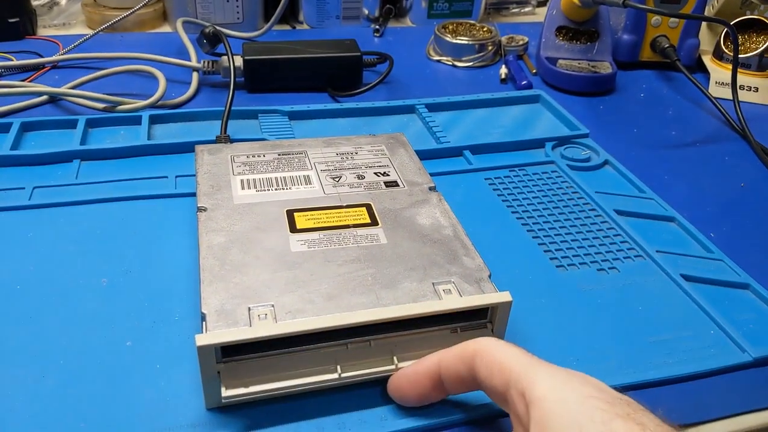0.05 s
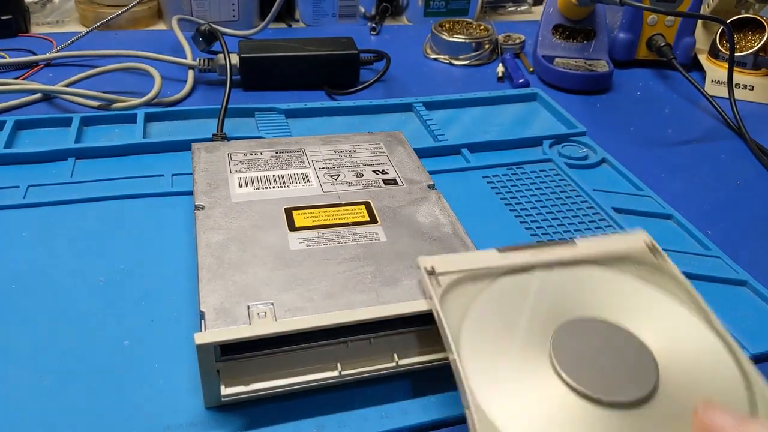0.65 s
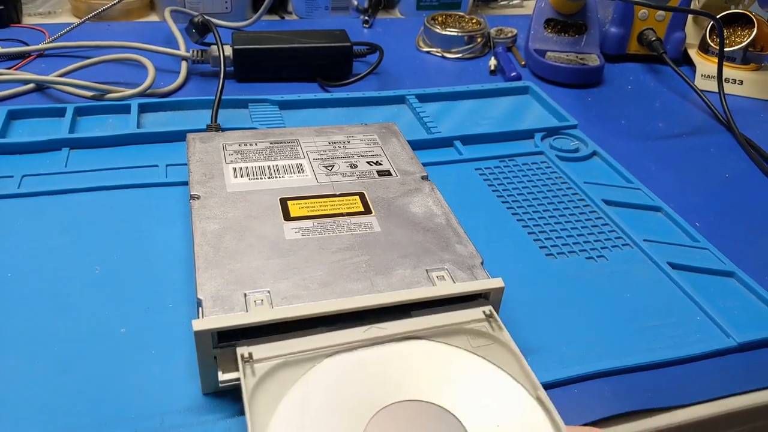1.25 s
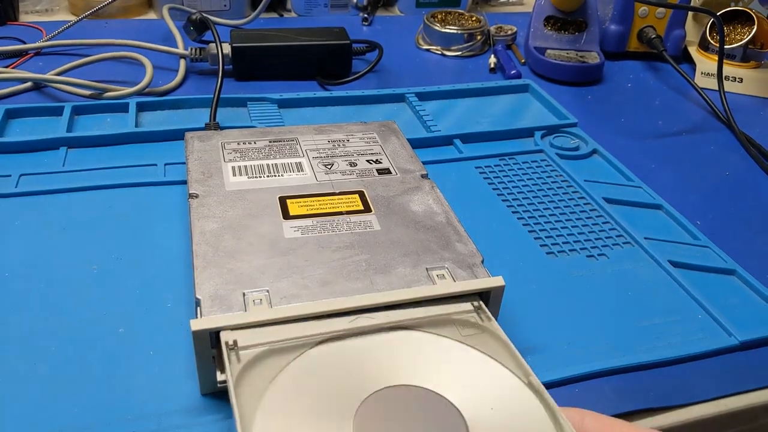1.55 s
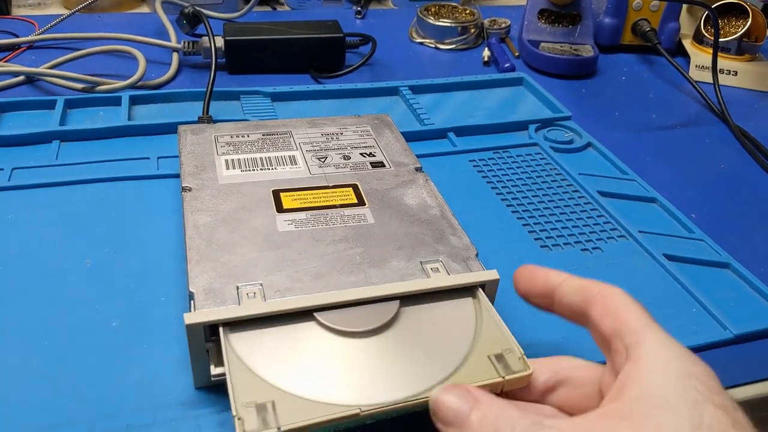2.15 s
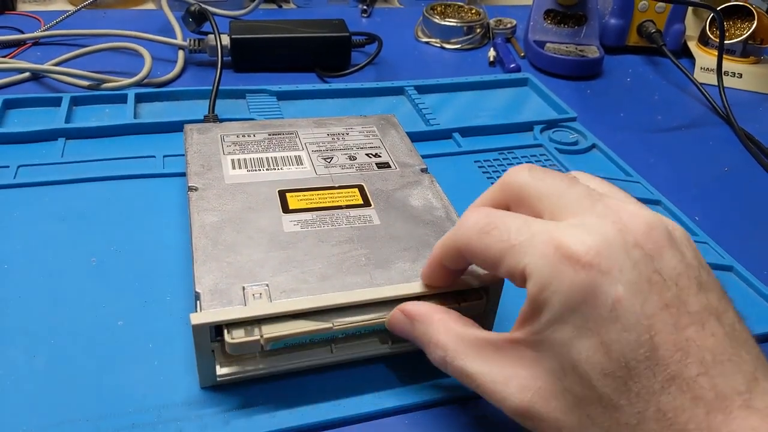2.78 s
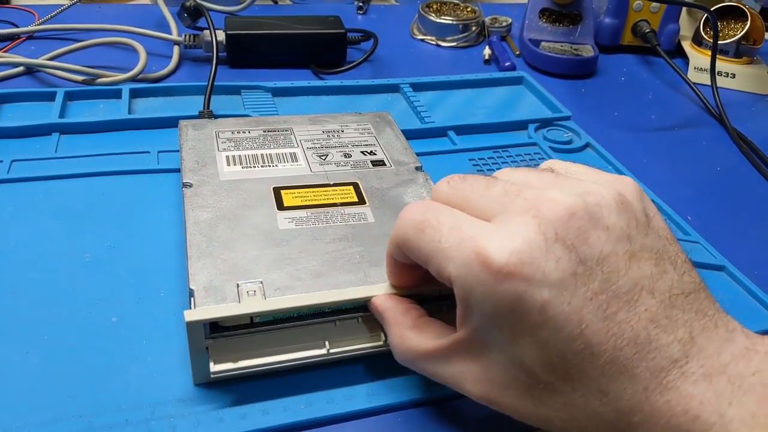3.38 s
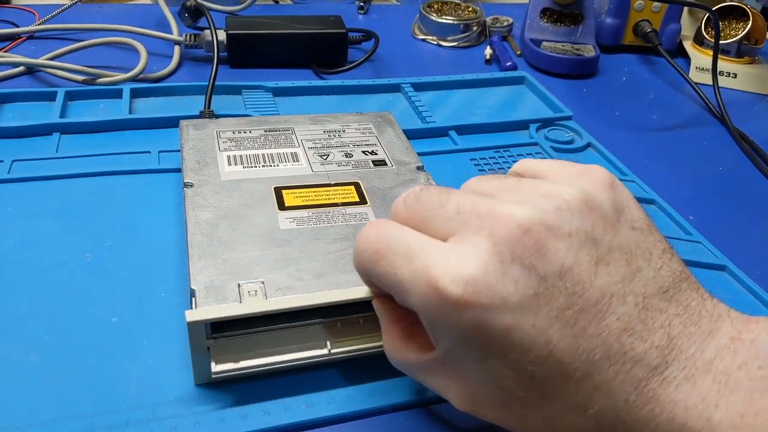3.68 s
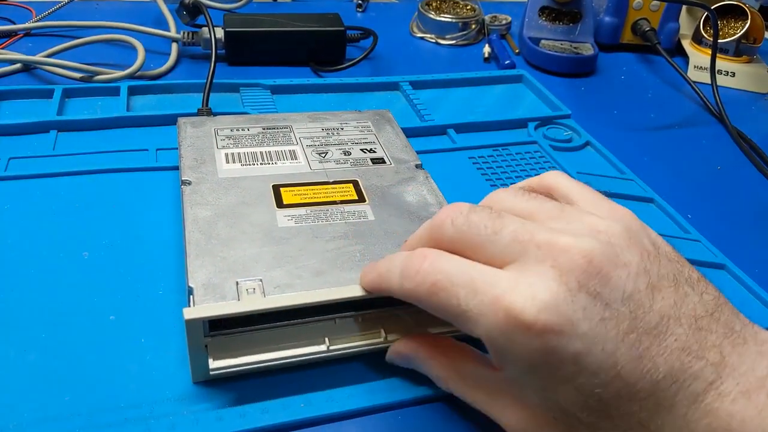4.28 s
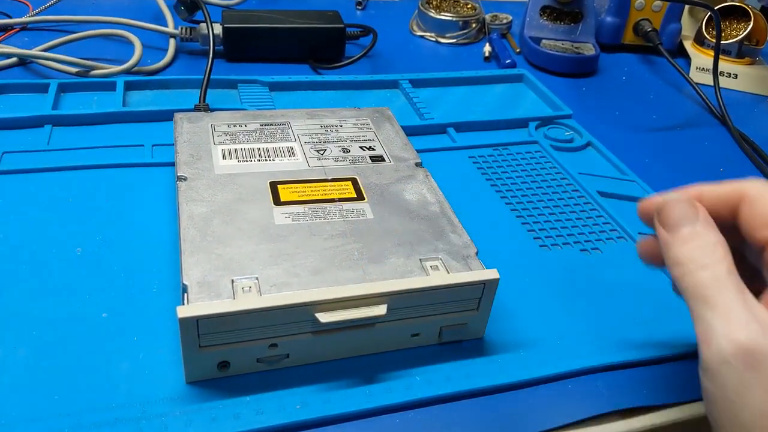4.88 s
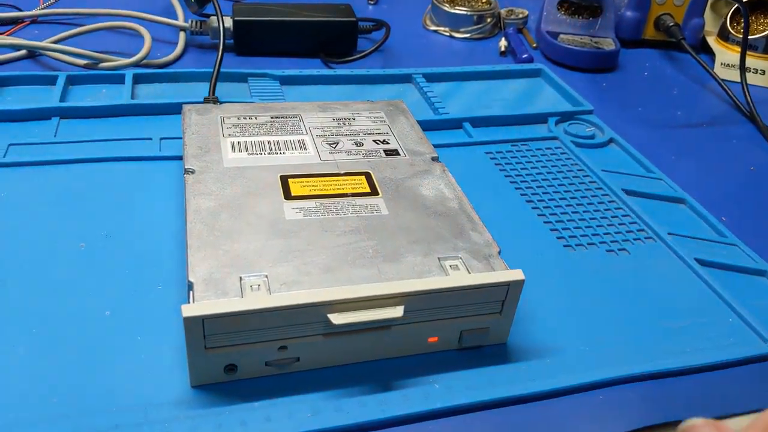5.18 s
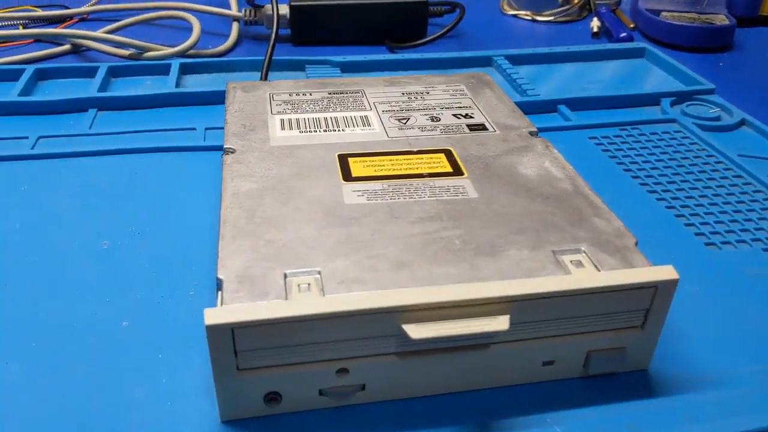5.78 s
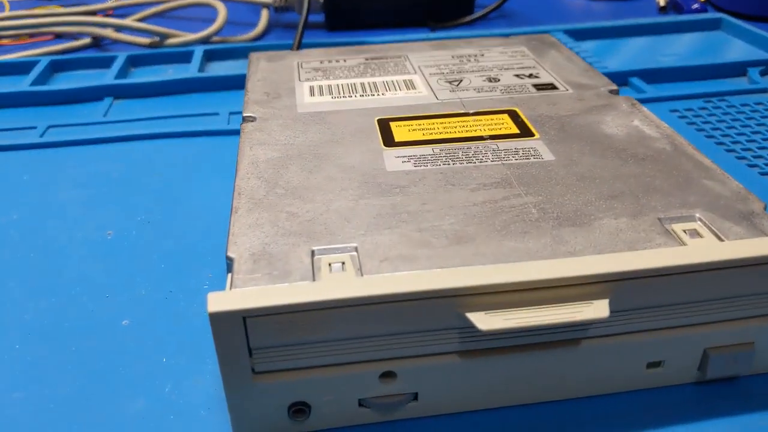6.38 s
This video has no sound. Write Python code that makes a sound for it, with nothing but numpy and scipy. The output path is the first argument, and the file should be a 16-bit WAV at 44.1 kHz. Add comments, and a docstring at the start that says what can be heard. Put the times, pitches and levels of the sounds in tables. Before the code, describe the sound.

Close up in a small, dry, softly humming workroom, hollow plastic clicks and rubs as a caddy is pushed into a disc drive. Short squeaks and faint gear squeals follow as it is pulled inside, ending in a double clack with a low thump. Then the sprung flap closes with the loudest snap, briefly ringing the steel case, and a faint airy whir of the spinning disc remains.

```python
"""A small dry workroom with a low hum; a stereo microphone close to a disc drive on a bench mat.
A plastic caddy is picked up, rattled into the slot and pushed home: its shell clicks at each contact
and rubs on the guides. The loader draws it in with stick-slip squeaks and thin gear squeals, then
clamps it with a clack that thumps the bench. The sprung front flap snaps shut and sets the steel
case ringing; the drive then spins up faintly."""
import sys
import numpy as np
from scipy import signal
from scipy.fft import rfft, irfft, next_fast_len
from scipy.io import wavfile

SR = 44100
rng = np.random.default_rng(int(sys.argv[2]) if len(sys.argv) > 2 else 0)


def int16_out(signal):
    """Quantize to a 16-bit WAV file."""
    q = np.round(np.clip(np.atleast_2d(signal).T, -1, 1) * 32767)
    wavfile.write(sys.argv[1], SR, q.astype(np.int16))


N = 288052

# stereo picture of the room and of the close sources: f/Hz, left over right/dB
ROOM_BALANCE = [(60, -0.5), (400, -1.5), (1500, 4), (5000, 0.5), (12000, -5.5)]
CLOSE_BALANCE = [(60, 2), (380, -3.5), (700, 7), (1290, 6.5), (2400, 13.5), (4400, 9), (6500, -0.5),
                 (9000, 1.5), (15000, -11.5)]
# spectra of the plastic shell and of the hard contact crack: f/Hz, level/dB
SHELL_SPECTRUM = [(140, -26), (300, -14.5), (680, -9.5), (850, -9.5), (1030, -5), (1230, 0), (1700, 2.5),
                  (2400, 2.5), (3500, -0.5), (4700, -4.5), (5800, -15), (7500, -22.5), (11000, -43)]
CRACK_SPECTRUM = [(3000, -6.5), (6000, -4.5), (7500, -11.5), (8800, -2), (10500, -3), (12500, -8),
                  (15500, -14), (17000, -32)]
# low modes of the case on its mat: f/Hz, level/dB, t60/s
KNOCK_MODES = [(190, -12.5, 0.046), (262, -7.5, 0.063), (340, 0.5, 0.053), (495, -8.5, 0.072)]
# caddy contacts: t/s, level/dB, relative crack/dB, ring of the spot hit f/Hz, shell t60/s, rebound/dB
CADDY_CONTACTS = [(0.053, -20, -10.5, 3260, 0.034, -14.5), (0.191, -43.5, -12, 960, 0.013, -22.5),
                  (0.502, -42.5, -32, 1290, 0.0098, -25), (0.657, -38, -21, 1670, 0.022, 0),
                  (0.677, -35.5, -22, 1136, 0.032, -22), (0.829, -24.5, -11.5, 2320, 0.039, -13),
                  (0.962, -33.5, -8.5, 1315, 0.076, -21), (0.986, -33.5, -14, 3380, 0.055, -5.5),
                  (1.174, -43.5, -26, 1265, 0.042, -22), (1.247, -29, -20.5, 2430, 0.022, -29),
                  (1.291, -26, -11, 1896, 0.032, -34), (1.351, -28, -9.5, 3840, 0.029, -25),
                  (1.384, -22, -13, 1590, 0.025, -20), (1.428, -32, -18, 1256, 0.023, -20),
                  (1.672, -28.5, -3, 1215, 0.031, -1), (1.832, -37.5, -9, 1320, 0.02, 3.5),
                  (1.91, -31, -15, 1690, 0.027, -12), (1.942, -32.5, -7.5, 1220, 0.017, -16),
                  (2.039, -32, -15, 1410, .03, -1.5), (2.062, -32.5, -6.5, 1212, 0.038, 2),
                  (2.243, -43, -14, 1420, 0.027, -20), (2.268, -42, -11, 1530, 0.03, -12.5),
                  (2.366, -41, -25, 1490, 0.018, -7), (2.419, -38, -13, 1087, 0.049, -26),
                  (2.487, -31.5, 1, 2123, 0.03, 1.5), (2.562, -28.5, -10, 1656, 0.031, -13),
                  (2.86, -43.5, -12.5, 1584, 0.029, -13), (3.177, -42.5, -3, 2000, 0.027, -22),
                  (3.289, -38.5, -2.5, 1890, 0.022, -31), (3.871, -26, -5, 1755, 0.043, 3),
                  (3.938, -25, -18, 1610, 0.026, -18), (4.037, -41.5, -14, 2240, 0.046, -1),
                  (4.456, -37, -20.5, 2517, 0.041, -21), (5.574, -52, -23, 2560, 0.029, -13),
                  (6.316, -53, -9, 1423, 0.026, -20)]


def from_db(db):
    """Decibels to gain."""
    return 10 ** (np.asarray(db) / 20)


def unit_rms(x):
    """Scale to unit power."""
    return x / np.sqrt(np.mean(x ** 2) + 1e-20)


def at_hz(points, hz):
    """Read a curve on a log-frequency axis."""
    f, value = np.transpose(points)
    return np.interp(np.log(np.maximum(hz, 1)), np.log(f), value)


def pan(hz, balance=CLOSE_BALANCE):
    """Left and right gains at a frequency, of constant total power."""
    gains = from_db(np.array([[.5], [-.5]]) * at_hz(balance, hz))
    return gains / np.sqrt(np.mean(gains ** 2, axis=0))


def drift(rate_hz):
    """Smooth random wandering; rms 1."""
    size = next_fast_len(N, real=True)
    f = np.fft.rfftfreq(size, 1 / SR)
    white = rfft(rng.standard_normal(size))
    return unit_rms(irfft(white / (1 + (f / rate_hz) ** 2), size)[:N])


def noise(spectrum, balance=CLOSE_BALANCE, right_lag_s=.00006):
    """Coloured stereo noise, most alike on both sides in the bass; rms 1."""
    # likeness of the microphone's two channels: f/Hz, correlation
    likeness = [(60, 0.77), (250, .93), (600, 0.36), (1300, 0.17), (3000, 0.33), (10000, 0.19)]
    size = next_fast_len(N)
    f = np.fft.rfftfreq(size, 1 / SR)
    mid, side = rfft(rng.standard_normal((2, size)))
    alike = at_hz(likeness, f)
    both = np.sqrt(1 + alike) * mid + np.sqrt(1 - alike) * side * [[1], [-1]]
    both[1] *= np.exp(-2j * np.pi * f * right_lag_s)   # the right capsule is farther away
    coloured = both * from_db(at_hz(spectrum, f)) * pan(f, balance)
    return unit_rms(irfft(coloured, size)[:, :N])


def add(out, s, sound):
    """Mix a sound in at s seconds."""
    i = int(s * SR)
    out[:, i:i + sound.shape[-1]] += sound[..., :N - i]


def decay(t, t60):
    """Free decay by 60 dB in t60."""
    return np.exp(-np.log(1000) * t / t60)


def since(s):
    """Seconds since a moment, zero before it."""
    return np.maximum(np.arange(N) / SR - s, 0)


def stroke(start, end, db, fade_s, easing_db_per_s=0):
    """Gain of a movement that fades in, holds or eases off, and fades out."""
    elapsed, remaining = since(start), end - np.arange(N) / SR
    fade = np.clip(np.minimum(elapsed, remaining) / fade_s, 0, 1)
    return from_db(db - easing_db_per_s * elapsed) * fade


def mode(t, hz, t60, right_lag_s=.00006):
    """One struck mode, reaching the right capsule a little later."""
    t = np.maximum(t - np.array([[0], [right_lag_s]]), 0)
    return np.sin(2 * np.pi * hz * t) * decay(t, t60) * pan(hz)


def struck(t, modes, spread_db=2):
    """A body's modes, each with a new strength at every blow."""
    return sum((-1) ** k * from_db(db + spread_db * rng.standard_normal()) * mode(t, hz, t60)
               for k, (hz, db, t60) in enumerate(modes))


def stick_slip(resonances, slips_per_s, spread_db, stereo_spread):
    """Quick uneven slips drive resonances (f/Hz, width/Hz, level/dB); rms 1."""
    slips = (rng.random(N) < slips_per_s / SR) * from_db(-spread_db * rng.standard_normal(N))
    slips = slips * (1 + stereo_spread * rng.standard_normal((2, N))) + 1e-18
    out = 0
    for k, (hz, width, db) in enumerate(resonances):
        radius = np.exp(-np.pi * width / SR)
        feedback = [1, -2 * radius * np.cos(2 * np.pi * hz / SR), radius ** 2]
        ring = signal.lfilter([1 - radius, 0, radius - 1], feedback, slips)
        out = out + (-1) ** k * from_db(db) * ring * pan(hz)
    return unit_rms(out)


def room_air():
    """Steady room tone all around the microphone."""
    # spectrum of the air: f/Hz, level/dB
    air_spectrum = [(15, -46.5), (25, -9.5), (175, -8.5), (200, -11), (256, -2), (285, -13), (394, -6),
                    (439, -24), (476, -5), (591, -11), (962, -7.5), (1520, -13), (7510, -30), (14400, -33),
                    (16000, -27)]
    return from_db(-58) * noise(air_spectrum, ROOM_BALANCE)


def hum(waver_rad=.6):
    """A low hum in the centre, each tone wavering in phase."""
    # hum tones: f/Hz, level/dB
    tones = [(59.5, -77.5), (120, -81.5), (253, -71.5), (312, -75.5), (458, -76)]
    t = np.arange(N) / SR
    return sum(from_db(db) * np.sqrt(2) * np.sin(2 * np.pi * hz * t + waver_rad * drift(4.7))
               for hz, db in tones)


def spindle():
    """A faint rush of air swells as the spindle comes up to speed."""
    # spectrum of the stirred air: f/Hz, level/dB
    rush_spectrum = [(200, -29), (450, -8.5), (850, 12), (1300, -24.5), (2500, 0.5), (6000, -36)]
    # its swell: t/s, level/dB
    spin_up = [(4.7, -91.5), (5.2, -70.5), (5.9, -71.5), (6.5, -69.5)]
    level_db = np.interp(np.arange(N) / SR, *np.transpose(spin_up))
    return from_db(level_db) * noise(rush_spectrum, ROOM_BALANCE)


def room_echo(close, build_s=0.0015):
    """Dense reflections build up within milliseconds and reach both capsules about equally."""
    # reverberation by band: low f/Hz, high f/Hz, level/dB, t60/s
    bands = [(312, 1170, -8, 0.15), (701, 1780, -7.5, 0.23), (2546, 21000, -10.5, 0.351),
             (5900, 14000, -6.5, 0.21)]
    t = np.arange(SR // 2) / SR
    diffuse = noise([(1, 0), (SR, 0)], ROOM_BALANCE)
    response = 0
    for k, (low, high, db, t60) in enumerate(bands):
        bandpass = signal.butter(2, [low, high], "band", fs=SR, output="sos")
        band = signal.sosfilt(bandpass, diffuse[:, k * len(t):(k + 1) * len(t)])
        shape = decay(t, t60) * (1 - np.exp(-(t / build_s) ** 2))
        response = response + from_db(db) * band * shape / np.sqrt(np.sum(shape ** 2))
    mono = close.sum(axis=0, keepdims=True) / np.sqrt(2)
    return signal.fftconvolve(mono, response, axes=1)[:, :N]


def bench(rise_s=0.0055):
    """The bench sways with a rumble under hand and latch, and thumps when the latch strikes."""
    # pushes on the bench: t/s, level/dB, t60/s
    sways = [(0.04, -60, 1.8), (1.39, -47.5, 3.6), (3.875, -37.5, 0.46)]
    # latch thumps: t/s, level/dB, f/Hz, t60/s
    thumps = [(3.879, -33, 47.3, 0.18), (3.937, -45, 85.5, 0.15)]
    # rumble spectrum: f/Hz, level/dB
    rumble = [(12, -18), (28, -3.5), (46, 3.5), (75, -9.5), (130, -12.5), (400, -49.5)]
    sway = sum(from_db(db) * (1 - np.exp(-since(s) / rise_s)) * decay(since(s), t60)
               for s, db, t60 in sways)
    out = sway * noise(rumble, ROOM_BALANCE)
    t = np.arange(SR // 3) / SR
    for s, db, hz, t60 in thumps:
        add(out, s, from_db(db) * mode(t, hz, t60))
    return out


def fingers():
    """A soft fingertip sounds only the low knock of the case."""
    # bumps on the housing: t/s, level/dB
    bumps = [(0.191, -52), (4.297, -46.5)]
    out, t = np.zeros((2, N)), np.arange(SR // 6) / SR
    for s, db in bumps:
        add(out, s, from_db(db) * struck(t, KNOCK_MODES))
    return out


def gears(pitch_waver=0.0023, flutter_db=3.0):
    """The loading gears squeal under load: thin, nearly pure tones that swell, waver and stop."""
    # squeals: start t/s, end t/s, f/Hz, level/dB
    squeals = [(3.307, 3.514, 3274, -65), (3.338, 3.527, 4230, -66.5), (3.382, 3.527, 3074, -57.5),
               (3.5, 3.57, 4550, -63), (3.554, 3.866, 3350, -62), (3.76, 3.84, 521, -54)]
    out, wander, flutter = np.zeros((2, N)), drift(28), drift(40)
    for start, end, hz, db in squeals:
        size = int((end - start) * SR)
        span = rng.integers(N - size) + np.arange(size)
        pitch_hz = hz * (1 + pitch_waver * wander[span])
        tone = np.sqrt(2) * np.sin(2 * np.pi * np.cumsum(pitch_hz) / SR)
        envelope = from_db(db + flutter_db * flutter[span]) * signal.windows.tukey(size, .5)
        add(out, start, envelope * tone * pan(hz))
    return out


def loader(sag_per_s=0.16, wobble=0.00696, wobble_hz=45):
    """The caddy sticks and slips as the loader runs it along the rails; each squeak sags in pitch."""
    # resonances of the caddy and of the rails: f/Hz, width/Hz, level/dB
    caddy_resonances = [(503, 30, -19), (1134, 36, -6), (1252, 18, -1), (1852, 87, -2.5), (1960, 44, 3.5),
                        (2340, 160, -26), (2926, 47, -5), (3370, 110, -17), (3860, 130, -10.5),
                        (4440, 200, -23), (9080, 86, -21.5)]
    rail_resonances = [(2040, 1800, -2.5), (3530, 530, 2.5), (4460, 390, -1.5), (5700, 250, -7.5),
                       (9600, 3000, -20)]
    # squeaks at take-up and near the stop: start t/s, end t/s, level/dB
    squeaks = [(3.125, 3.32, -34), (3.758, 3.858, -52)]
    # the caddy is drawn in, lowered and pressed to the stop: start t/s, end t/s, level/dB
    moves = [(3.175, 3.618, -55.5), (3.582, 3.794, -60.5), (3.745, 3.887, -50.5)]
    steady_squeak = stick_slip(caddy_resonances, slips_per_s=1500, spread_db=0.5, stereo_spread=0.6)
    rails = stick_slip(rail_resonances, slips_per_s=1900, spread_db=1, stereo_spread=1.0)
    out = rails * sum(stroke(*move, fade_s=.045) for move in moves)
    samples = np.arange(N)
    for start, end, db in squeaks:
        from_middle_s = np.clip(samples / SR, start, end) - (start + end) / 2
        speed = 1 - sag_per_s * from_middle_s + wobble * drift(wobble_hz)
        squeak = np.array([np.interp(np.cumsum(speed) % N, samples, side) for side in steady_squeak])
        out += stroke(start, end, db, fade_s=0.055, easing_db_per_s=56) * squeak
    return out


def friction(lead_in_s=0.011, lead_in_db=-19, release_t60=0.087):
    """Strength of the rubbing: a light slide, with swells where the caddy binds or is about to strike."""
    # the caddy binds ever harder, then slips free: slip t/s, swell/s, level/dB
    scrapes = [(0.04, 0.14, -49), (0.8, 0.018, -46), (1, 0.012, -30), (1.325, 0.016, -45),
               (1.702, 0.017, -32.5), (1.727, .005, -36.5), (1.885, .006, -42.5), (1.926, 0.0043, -39.5),
               (1.951, .008, -41.5), (2.06, 0.021, -35), (2.364, 0.026, -52), (2.72, 0.024, -49),
               (4.142, 0.035, -51), (4.487, 0.012, -44)]
    lead_ins = [(s, lead_in_s, db + lead_in_db) for s, db, *_ in CADDY_CONTACTS]
    gain, t = stroke(1.15, 2.97, db=-61, fade_s=0.19), np.arange(N) / SR
    for s, swell_s, db in scrapes + lead_ins:
        span = slice(max(int(s * SR) - SR // 5, 0), int(s * SR) + SR // 5)
        swell = np.exp(np.minimum(t[span] - s, 0) / swell_s)
        release = decay(np.maximum(t[span] - s, 0), release_t60)
        gain[span] = np.maximum(gain[span], from_db(db) * swell * release)
    return gain


def rubbing(grain_db=3.5, grain_hz=110, hiss_db=-10):
    """Sliding plastic catches and lets go in small grains; the caddy's shutter scrapes brightly open."""
    grains = unit_rms(from_db(grain_db * drift(grain_hz)))
    body = friction() * (noise(SHELL_SPECTRUM) + from_db(hiss_db) * noise(CRACK_SPECTRUM))
    shutter = stick_slip([(9840, 550, 7), (11700, 3800, 1)],
                         slips_per_s=2100, spread_db=2, stereo_spread=0.88)
    return grains * (body + stroke(2.3, 2.824, db=-61, fade_s=0.13) * shutter)


def spot_ring(t, hz, t60, split=0.05):
    """The spot that is hit rings with one mode and two weaker neighbours, which beat and blur it."""
    below, above = np.abs(rng.normal(split, split / 2, 2))
    neighbours = mode(t, hz * (1 - below), t60) - mode(t, hz * (1 + above), t60)
    return (mode(t, hz, t60) + .5 * neighbours) / np.sqrt(3 / 2)


def with_rebounds(contacts, delay_s, dulling_db=-6.5):
    """Each contact is a first touch, then a rebound with less crack."""
    for s, db, bright_db, hz, t60, rebound_db in contacts:
        yield s, db, bright_db, hz, t60
        yield s + delay_s, db + rebound_db, bright_db + dulling_db, hz, t60


def blows(touches, shell_db, knock_db, crack_db, ring_db, cavity_db, ring_length, crack_length,
          hard_rise_s, hard_db=-18):
    """Each blow excites the crowded shell modes, a crack, the spot hit, the case and the cavity."""
    # modes of the caddy's hollow: f/Hz, level/dB, t60/s
    cavity_modes = [(486, 2.5, 0.081), (810, -4, 0.095), (1091, -11, 0.033)]
    out, t = np.zeros((2, N)), np.arange(SR // 6) / SR
    shell, crack = noise(SHELL_SPECTRUM), noise(CRACK_SPECTRUM)
    for s, db, bright_db, hz, t60 in touches:
        softness_db = hard_db - db   # lighter touches rise more slowly and ring less
        attack = 1 - np.exp(-t / (hard_rise_s * from_db(.5 * softness_db)))
        # from 1.25 s to 2.12 s the caddy goes deeper into the slot and shakes the case more
        coupling_db = np.interp(s, [1.25, 2.12], [-23.5, -5])
        span = (int(s * SR) + np.arange(len(t))) % N
        hit = from_db(shell_db) * shell[:, span] * decay(t, t60)
        hit += from_db(crack_db + bright_db) * crack[:, span] * decay(t, t60 * crack_length)
        hit += from_db(ring_db - 0.17 * softness_db) * spot_ring(t, hz, t60 * ring_length)
        hit += from_db(knock_db + coupling_db) * struck(t, KNOCK_MODES)
        hit += from_db(cavity_db) * struck(t, cavity_modes)
        add(out, s, from_db(db) * attack * hit)
    # a high-pass keeps the knocks tight, with no deep boom
    highpass = signal.butter(2, 92, "high", fs=SR, output="sos")
    return signal.sosfilt(highpass, out + 1e-18)


def flap():
    """The sprung flap snaps shut, rebounds and leaves the steel case ringing."""
    # the flap's landing: same columns as CADDY_CONTACTS
    landing = [(4.5458, -13.5, 0.0019, 3447, 0.047, -6)]
    # modes of the steel case: f/Hz, level/dB, t60/s
    steel_modes = [(262.4, 2.5, 0.21), (1240, -4, 0.13), (1448, -5, 0.16), (1846, -4, 0.21),
                   (2583, -1, .24), (3405, -15.5, 0.19), (6177, -5, .16), (6570, -2, .16),
                   (8650, -7.5, 0.19), (9320, -1, 0.159), (10400, -5, 0.15)]
    out = blows(with_rebounds(landing, delay_s=.0127),
                shell_db=-0.5, knock_db=-4.5, crack_db=6.5, ring_db=-1.0, cavity_db=-27.5,
                ring_length=1, crack_length=0.61, hard_rise_s=0.0001)
    add(out, landing[0][0], from_db(-33.5) * struck(np.arange(SR // 2) / SR, steel_modes))
    return out


def caddy():
    """The caddy clicks in the hand, knocks into the slot and is clamped; the loose disc lands late."""
    return blows(with_rebounds(CADDY_CONTACTS, delay_s=.0072),
                 shell_db=5.5, knock_db=-1, crack_db=9.0, ring_db=5.0, cavity_db=-18.5,
                 ring_length=0.97, crack_length=0.77, hard_rise_s=0.00034)


def scene():
    """Caddy and drive close to the microphone, over their echo, the bench and the room tone."""
    close = caddy() + flap() + fingers() + rubbing() + loader() + gears()
    return close + room_echo(close) + bench() + hum() + spindle() + room_air()


def record(dry, ceiling=.9, cutoff_hz=16300):
    """The recorder rounds the peaks and cuts the highest treble."""
    lowpass = signal.ellip(10, .2, 70, cutoff_hz, fs=SR, output="sos")
    return signal.sosfilt(lowpass, ceiling * np.tanh(dry / ceiling))


dry = scene()
out = record(dry)
int16_out(out)
```